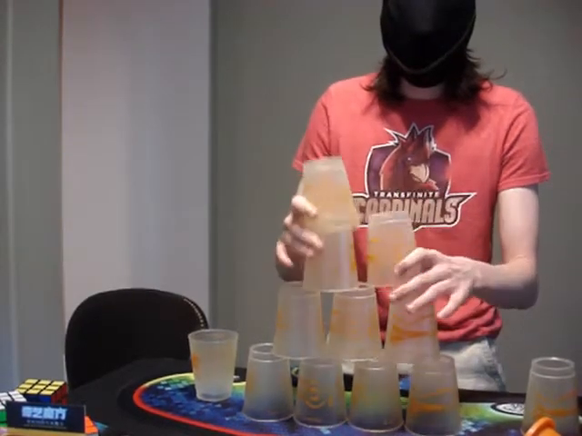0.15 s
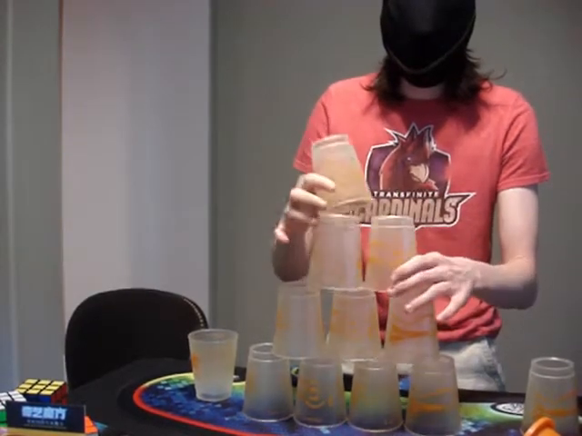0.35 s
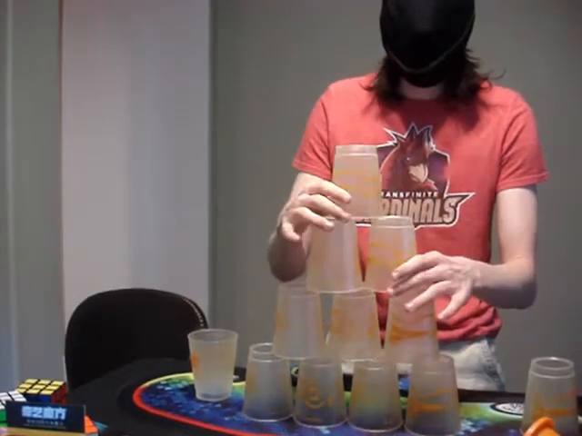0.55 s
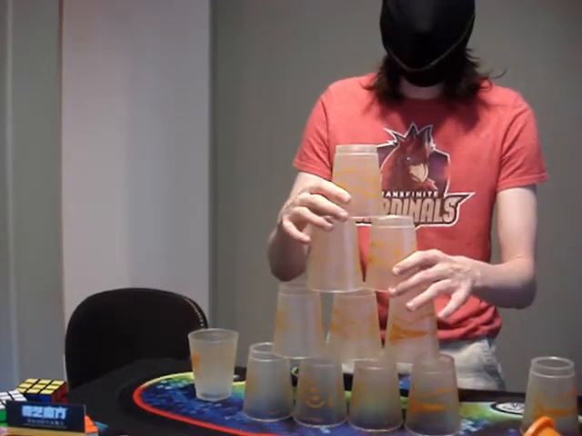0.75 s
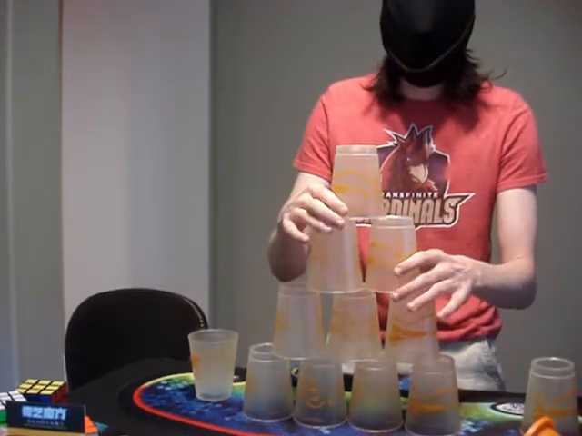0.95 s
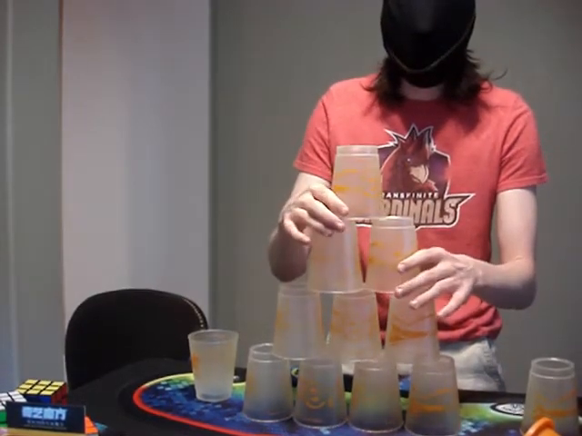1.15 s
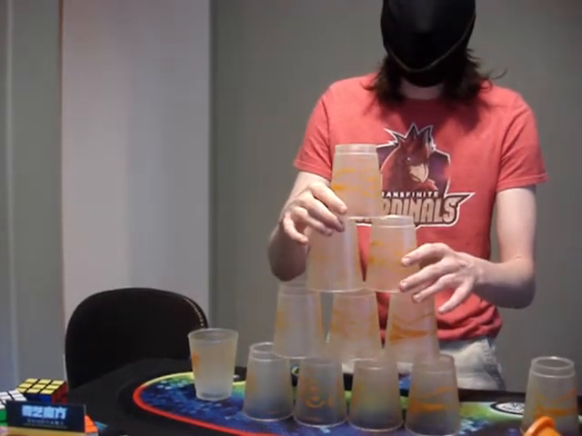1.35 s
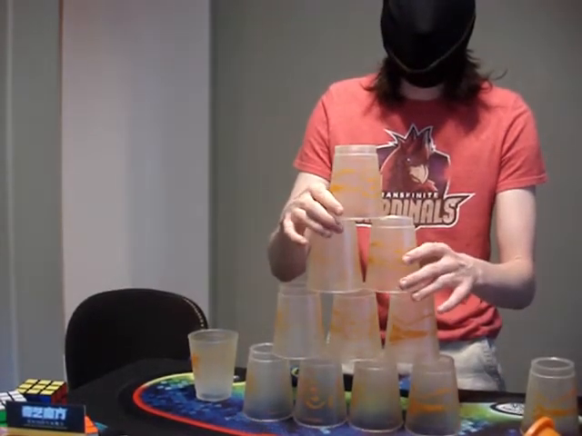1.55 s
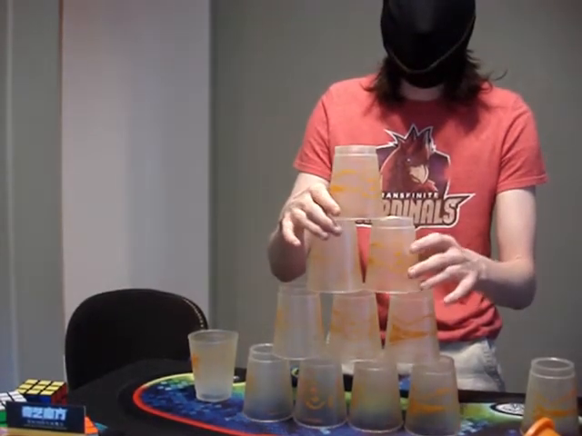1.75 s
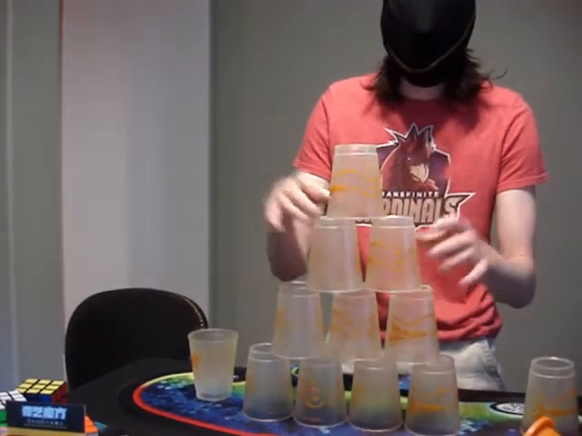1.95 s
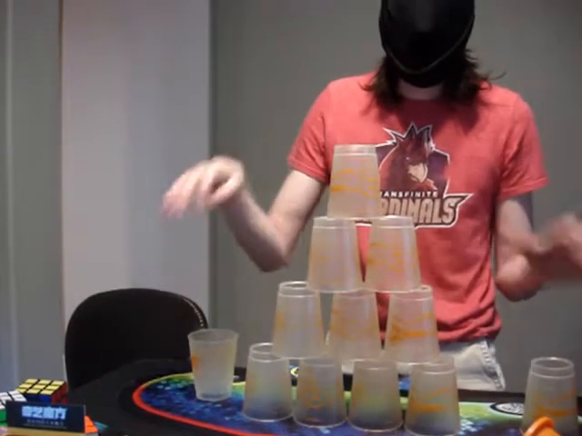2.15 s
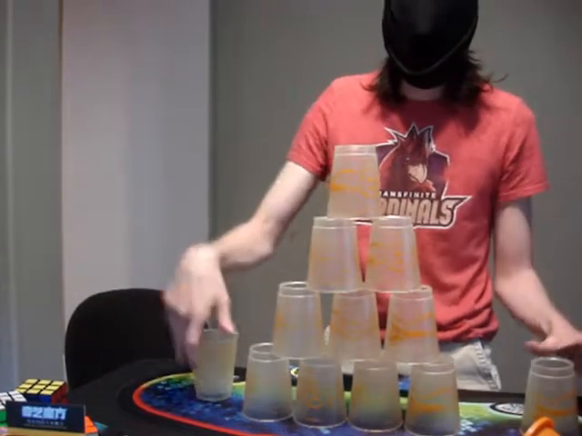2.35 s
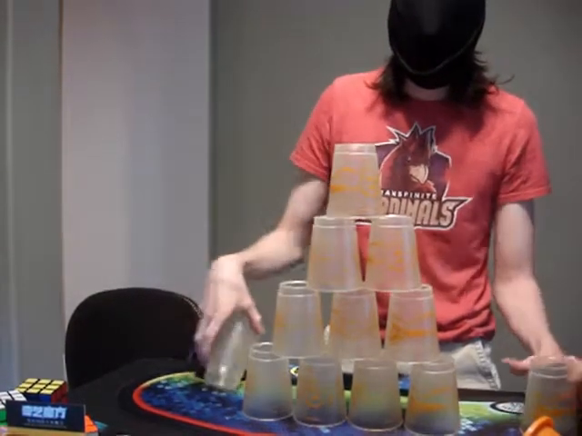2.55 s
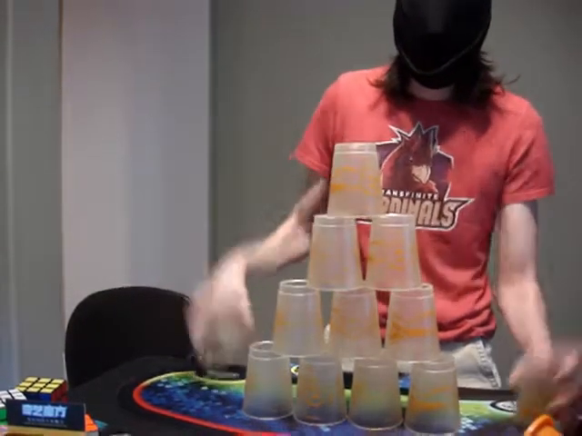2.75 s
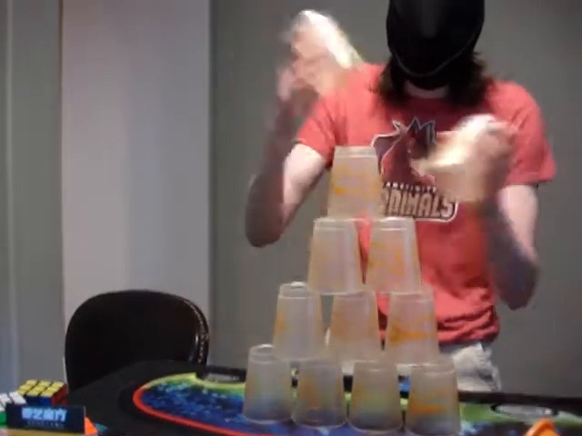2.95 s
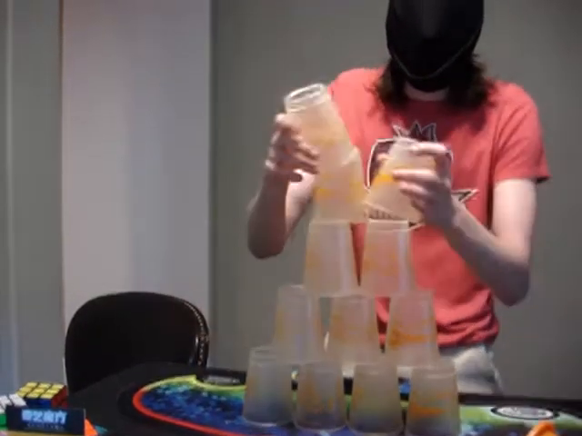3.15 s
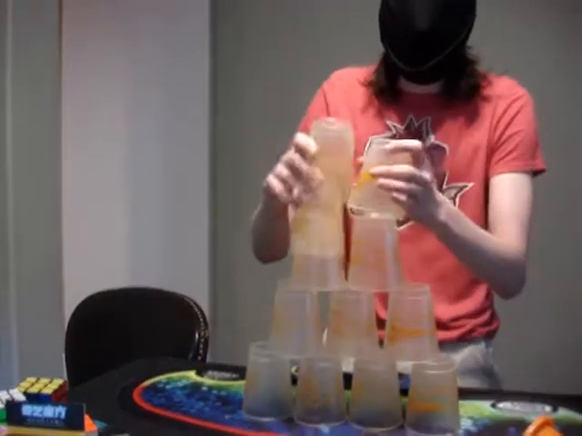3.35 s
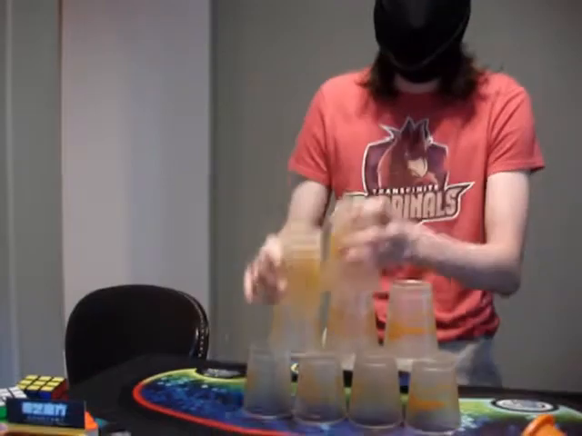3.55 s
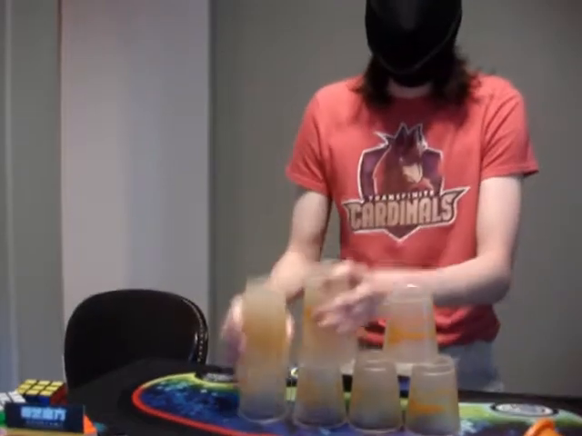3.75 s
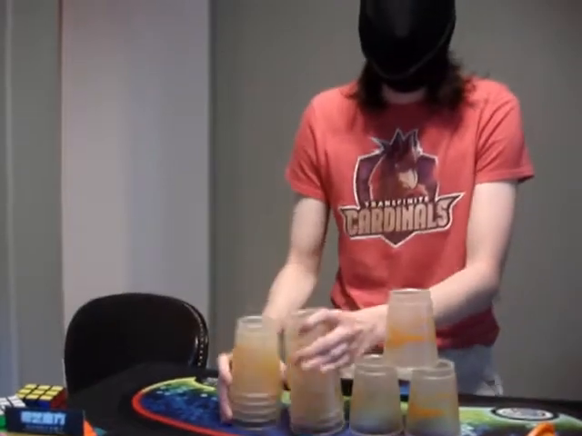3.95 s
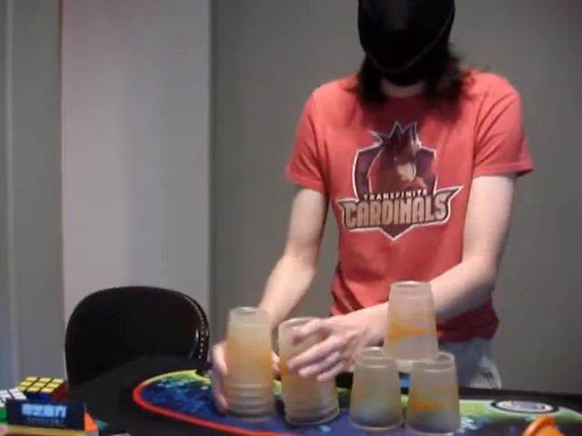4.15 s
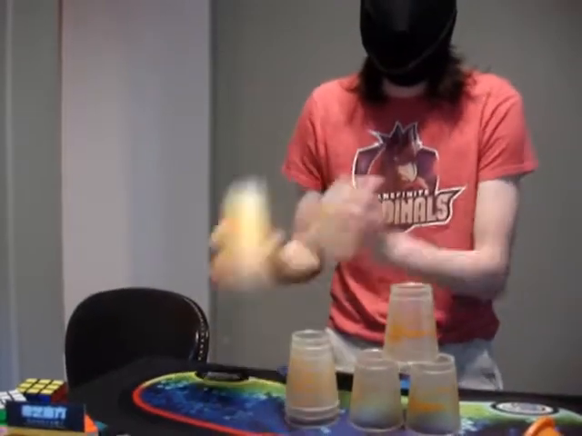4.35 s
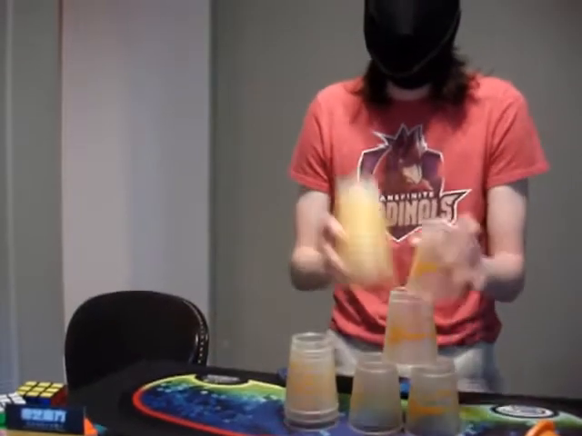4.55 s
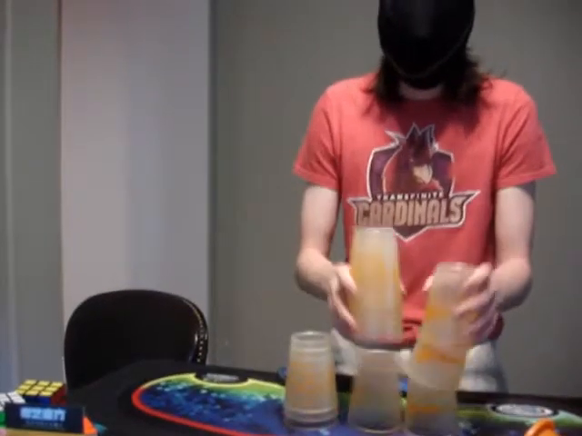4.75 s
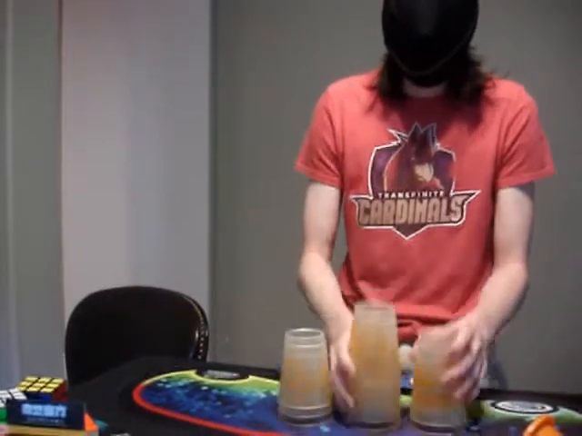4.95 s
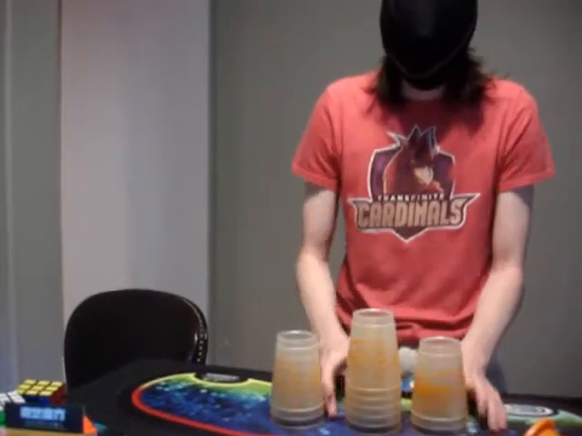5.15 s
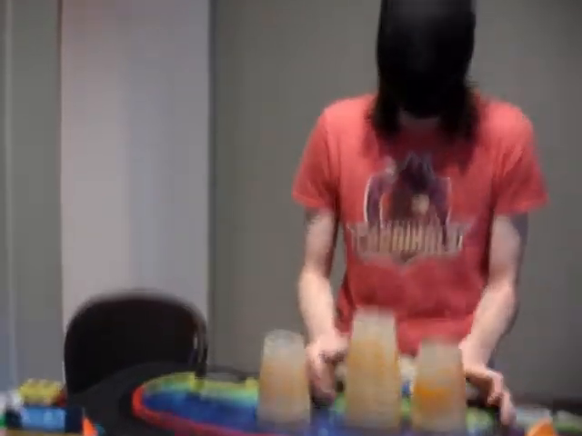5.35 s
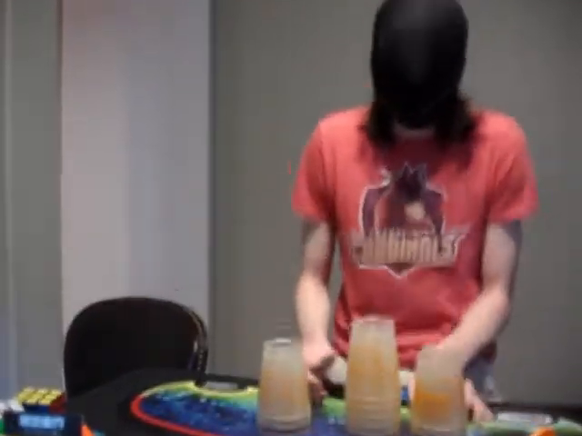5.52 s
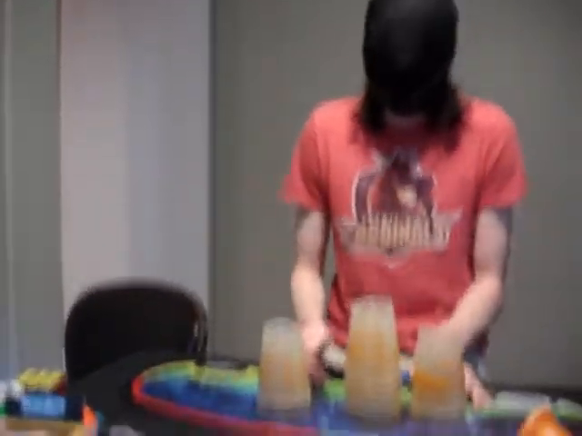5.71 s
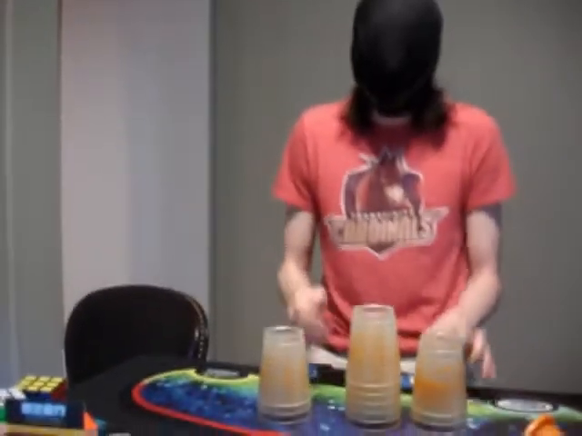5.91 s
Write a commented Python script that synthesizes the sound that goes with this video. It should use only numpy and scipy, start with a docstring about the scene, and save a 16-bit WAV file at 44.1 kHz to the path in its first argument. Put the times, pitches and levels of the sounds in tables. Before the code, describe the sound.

Thin plastic cups are set on a pyramid close to the microphone, making a quick cluster of hollow clicks, loudest between 0.2 and 0.6 seconds. A few faint ticks follow around 1 second, and at 1.2 seconds one sharp clack comes from farther across the room. A lull follows, with only faint steady ventilation, until soft table bumps and a finger tap at about 2.5 to 2.7 seconds. From 3.1 to 4.1 seconds the cups are swept into nested stacks in a rapid clatter of knocks, rattles and tiny scrapes, with dull thuds on the padded table. After a short gap, a second run lasts from 4.6 to 5 seconds. Muffled thuds and light taps follow, the firmest at 5.5 seconds, with a last tap near 5.8. The small bare room rings briefly after each knock.

```python
"""A small bare room, the microphone close to a padded table where thin plastic cups are being stacked.
Cups are set on a pyramid, then swept down into nested stacks. Each knock is a rim tick and a short
hollow ring; a nesting cup rattles and scrapes until it is seated, and the table thuds under its mat.
One sharp clack comes from farther off. The room rings after everything, over steady ventilation."""
import sys
import numpy as np
from scipy import signal
from scipy.io import wavfile
from scipy.ndimage import uniform_filter1d, minimum_filter1d

SR = 44100
rng = np.random.default_rng(int(sys.argv[2]) if len(sys.argv) > 2 else 0)


def master(y):
    """Save y as 16-bit WAV."""
    cut = np.clip(np.atleast_2d(y).T, -1, 1)
    pcm = np.round(cut * 32767)  # scale
    wavfile.write(sys.argv[1], SR, pcm.astype(np.int16))


N = 263702
AGE = np.arange(SR // 6) / SR  # seconds since a contact

# Cups set on the pyramid. Each row: start in seconds, ring level in dB, tick level in dB.
SET_DOWNS = [(0.002, -18, -35), (0.039, -14.5, -35), (0.206, 2.5, -14), (0.259, 1.5, -14), (0.284, -2, -14),
             (0.425, -7, -34), (0.442, 2.5, -7.5), (0.525, 3.5, -16), (0.537, -7.5, -12.5), (0.577, 8, -4),
             (0.589, -8.5, -8), (0.904, -22.5, -37), (0.923, -13.5, -30), (1.004, -15, -32.5),
             (1.155, -24.5, -32)]
# Cups dropping into one another. Each row: start in seconds, ring level in dB, ring centre in Hz,
# hollow air tone in dB against the ring, tick level in dB, time until seated in seconds.
NESTINGS = [(3.109, 9, 875, -13, 1.5, 0.016), (3.116, 1, 1433, 6, -17, .03),
            (3.145, 0.5, 960, -6.5, -7.5, .03), (3.166, -1.5, 1070, -4.5, -20, .03),
            (3.191, 4.5, 1460, -20, -9.5, .035), (3.315, -7, 933, -3, -12, .02),
            (3.328, 2, 1130, -13, -2.5, .02), (3.386, -5.5, 690, -21, -13.5, .04),
            (3.432, -6.5, 850, -23, -10.5, .035), (3.471, 2, 910, -2.5, -3.5, .06),
            (3.556, -6, 990, 0.5, -2.5, .05), (3.603, -1, 1500, 2, -2.5, 0.02),
            (3.653, -6.5, 1630, -7, -12, 0.011), (3.678, 0.5, 780, -5.5, -7, .05),
            (3.746, -6, 922, 7, -4, .075), (3.827, -5, 1120, -18, -6, 0.011),
            (3.88, -3, 1816, -0.5, -7, .07), (3.961, -16, 2010, -4, -16, .035),
            (4.012, -2.5, 1056, -10, -5.5, .03), (4.05, -19, 1110, -9, -20, .04),
            (4.121, -22.5, 1580, 4.5, -22.5, .02), (4.6002, 3, 680, -10, -4, .025),
            (4.61, -9, 1220, 9, -17, .07), (4.627, -1.5, 616, -1, -6.5, .03),
            (4.664, -4, 1230, 0.5, -10.5, .05), (4.8, -16, 850, -13, -12, .03),
            (4.82, -15, 676, 1.5, -10.5, .045), (4.866, -8.5, 640, -17, -9.5, .03),
            (4.919, -3, 1446, 1.5, -3.5, .065), (4.984, -13, 1370, -7, -33, .02),
            (5.015, -0.5, 1106, -26, -4, .025), (5.039, -11.5, 900, -26, -20, .03)]
# Table landings, fingertip taps and cups brushing past each other. Each row: start in seconds, level in dB.
THUDS = [(0.208, -19), (0.579, -18), (2.483, -26), (2.72, -16), (3.335, -23.5), (3.682, -18.5),
         (3.886, -5.5), (4.019, -29), (4.626, -6), (4.835, -13.5), (4.869, -14), (5.019, -14.5),
         (5.212, -17.5), (5.262, -14), (5.516, -6)]
TAPS = [(2.715, -22), (5.31, -22.5), (5.511, -27), (5.788, -26)]
BRUSHES = [(2.708, -44.5), (4.308, -47), (5.301, -57.5), (5.508, -52.5)]

# What rings when struck. Each row: frequency in Hz, relative level in dB, seconds to fall 60 dB.
CUP_MODES = [(454, -10.5, 0.049), (571, -3, 0.03), (649.5, -1, 0.029), (850, -2, 0.019), (908, 1.5, 0.013),
             (1097, -1.5, 0.026), (1232, 3, 0.017), (1464, -2, 0.035), (1526, -4.5, 0.013),
             (1860, -17.5, 0.03)]  # wall and hollow
RIM_MODES = [(2060, 4, 0.0068), (2590, -0.5, 0.0063), (3076, -4.5, 0.0046), (3254, -0.5, 0.012),
             (4250, -0.5, 0.019), (5276, 1, 0.022), (6260, -4, 0.017)]
TABLE_MODES = [(121.1, -14, 0.34), (179.3, 0, 0.07), (238, -1, 0.04), (283.3, -10.5, 0.088),
               (398, -10.5, 0.048), (473, 0.5, 0.028), (620, 5, 0.02)]
CLACK_MODES = [(594, -8, 0.17), (680, -20, 0.046), (1137, -9, 0.074), (1436, -3.5, 0.12),
               (2060, -5.5, 0.094), (2210, -1, 0.054)]

# Spectra of the noises. Each row: frequency in Hz, relative level in dB.
TICK_SPECTRUM = [(30, -24), (90, -23.5), (190, -10.5), (500, -0.5), (1500, 6), (2500, -0.5), (5000, -4),
                 (7000, -6), (10000, -15), (12000, -14), (16000, -16.5)]  # cup on cup
FINGER_SPECTRUM = [(60, -9), (300, 0.5), (1200, 7), (3000, 3.5), (6000, -14), (10000, -17.5), (16000, -26)]
SCUFF_SPECTRUM = [(100, -24), (1000, -7), (3000, -7), (6000, 4), (9000, -5.5), (16000, -24)]  # cup brushing cup
CLACK_SPECTRUM = [(80, -32), (200, -4), (450, -9), (700, 7), (1700, 2.5), (2100, 8.5), (2500, -2.5),
                  (3000, 1.5), (3850, 1.5), (4300, -9), (4900, -11), (5600, -15), (10000, -26),
                  (16000, -16)]
HUSH_SPECTRUM = [(15, -61.5), (25, -2), (92, -19), (120, -2.5), (229, -9.5), (249, -13.5), (363, -7),
                 (560, -8.5), (624, -5), (863, -9), (962, -7), (1130, -8.5), (1560, -11), (7710, -24),
                 (16000, -43)]

# Reflections off nearby surfaces. Each row: delay in seconds, gain as a factor.
ECHOES = [(.0029, 0.38), (.0085, 0.49), (0.0118, 0.24), (0.0135, 0.17), (.026, 0.11)]
# The room's decay. Each row: frequency in Hz, seconds to fall 60 dB.
ROOM_T60 = [(120, 0.33), (280, 0.45), (600, 0.56), (1100, 0.63), (2300, 0.69), (7000, 0.64), (14000, 0.54)]
# Colour of the cups' diffuse sound against the direct. Each row: frequency in Hz, gain in dB.
DIFFUSE_COLOUR = [(80, -0.5), (160, 7), (400, -1.5), (1200, -2), (3000, -3), (6000, -3.5), (9500, -8.5),
                  (12000, -0.5)]
# Overall tone: full middle, treble cut sharply above 10 kHz, faint fizz at the top.
# Each row: frequency in Hz, gain in dB.
OVERALL_COLOUR = [(30, -3.5), (300, 5), (1500, 2.5), (5000, 4), (9800, 0), (10400, -20), (12000, -28.5),
                  (15500, -14.5)]


def nesting_cups(slide_db=-24, rattle_db=-7, rattle_tick_db=-11, bump_db=-37):
    """Close up, a cup strikes the one below, then rattles and slides down until it is seated."""
    out = np.zeros(N)
    contact = dict(rim_db=-2.5, rim_hz=2730, soft_hz=10000, octaves=1.0, rise_s=0.0002)
    for s, ring_db, centre_hz, hollow_db, tick_db, seat_s in NESTINGS:
        add(out, s, cup_knock(ring_db, centre_hz, tick_db, hollow_db, **contact))
        add(out, s, amp(ring_db + bump_db) * low_bump())
        add(out, s, amp(tick_db + slide_db) * scrape(seat_s, wall_slip()))
        for delay, db in rebounds(seat_s):
            rattle = cup_knock(ring_db, centre_hz, tick_db + rattle_tick_db, hollow_db, **contact)
            add(out, s + delay, amp(rattle_db + db) * rattle)
    return out


def pyramid_cups(chatter_db=-19.5, chatter_s=0.018):
    """Close up, loose cups land rim first on the pyramid and chatter briefly."""
    out = np.zeros(N)
    for s, ring_db, tick_db in SET_DOWNS:
        knock = cup_knock(ring_db, centre_hz=753, tick_db=tick_db, hollow_db=-24,
                          rim_db=-8.5, rim_hz=4800, soft_hz=7000, octaves=1.8, rise_s=0.00098)
        add(out, s, knock)
        for delay, db in rebounds(chatter_s):
            add(out, s + delay, amp(chatter_db + db) * rng.choice([-1, 1]) * knock)
    return out


def cup_knock(ring_db, centre_hz, tick_db, hollow_db, rim_db, rim_hz, soft_hz, octaves, rise_s):
    """A stiff rim strikes, and the walls and the air between them ring."""
    tick = crack(TICK_SPECTRUM, decay_s=0.005)
    tick += amp(rim_db) * ring(RIM_MODES, 0.04, rim_hz, octaves=0.76)
    give = np.exp(-2 * np.pi * soft_hz / SR)  # a gentler contact lasts longer and dulls the tick
    tick = signal.lfilter([1 - give], [1, -give], tick)
    hollow = ring([(centre_hz, 0, .032)], spread=0.019)
    walls = ring(CUP_MODES, 0.018, centre_hz, octaves)
    body = (walls + amp(hollow_db) * hollow) * (1 - np.exp(-AGE / rise_s))
    return amp(ring_db) * body + amp(tick_db) * tick


def rebounds(length_s, count=4, step_db=-2.5):
    """A cup bounces at uneven intervals, ever more softly: pairs of delay in seconds and level in dB."""
    bounce = np.arange(count)
    delays = length_s * (bounce + rng.uniform(.5, 1.5, count)) / count
    return zip(delays, step_db * bounce)


def wall_slip():
    """Wall on wall: one slip sets the cup and its rim ringing."""
    tick = crack(TICK_SPECTRUM, decay_s=0.0018)
    rasp = ring(RIM_MODES, spread=0.067, centre_hz=2860, octaves=0.16)
    body = ring(CUP_MODES, spread=0.073, centre_hz=1300, octaves=0.5)
    return tick + amp(-2) * rasp + amp(-7) * body


def scrape(length_s, voice, slips_per_s=1600):
    """Dense tiny slips of uneven size, each sounding the same voice."""
    n = int(length_s * SR)
    sizes = rng.standard_normal(len(AGE))
    slipping = rng.random(len(AGE)) < slips_per_s / SR
    slips = (sizes * slipping)[:n] * signal.windows.tukey(n, .3)
    rub = signal.fftconvolve(slips, voice)
    return rub * np.sqrt(n) / (np.linalg.norm(rub) + 1e-9)


def low_bump(decay_s=0.0041):
    """A faint, brief bass bump under each nesting knock."""
    u = AGE / decay_s
    return u * (2 - u) * np.exp(-u)


def padded_table(settle_s=.028, settle_db=-3):
    """Stacks and hands land on one edge, then settle flat with a deeper bump; fingers tap the cups."""
    out = np.zeros(N)
    for s, db in THUDS:
        add(out, s, amp(db) * thud(centre_hz=223))
        add(out, s + settle_s, amp(db + settle_db) * thud(centre_hz=189))
    for s, db in TAPS:
        add(out, s, amp(db) * crack(FINGER_SPECTRUM, decay_s=0.0075))
    return out


def thud(centre_hz, sharp_share=0.17, sink_s=0.007):
    """The table top rings dully; the pitch starts high and sinks as the mat gives."""
    tone = ring(TABLE_MODES, 0.012, centre_hz, octaves=0.83) * (1 - np.exp(-AGE / 0.002))
    lead_s = sharp_share * sink_s * (1 - np.exp(-AGE / sink_s))
    return np.interp(AGE + lead_s, AGE, tone)


def cup_brushes():
    """Cups brushing past each other leave a short, thin scuff on the plastic."""
    out = np.zeros(N)
    for s, db in BRUSHES:
        add(out, s, amp(db) * scrape(length_s=.03, voice=impulse(SCUFF_SPECTRUM)))
    return out


def far_clack(start_s=1.217):
    """One hard clack across the room: a crack and a weaker ring."""
    out = np.zeros(N)
    clack = crack(CLACK_SPECTRUM, decay_s=0.004) + amp(-11.5) * ring(CLACK_MODES, spread=0.0017)
    add(out, start_s, amp(-11) * clack)
    return out


def ring(modes, spread, centre_hz=1000, octaves=np.inf):
    """Dying modes, detuned at random by spread; the place of the blow favours those near a centre."""
    hz, db, t60 = np.transpose(modes)[:, :, None]
    detune, scatter_db = rng.standard_normal((2, len(modes), 1))
    weight = amp(db + scatter_db) / (1 + (np.log2(hz / centre_hz) / octaves) ** 2)
    weight *= rng.choice([-1, 1], hz.shape) / np.linalg.norm(weight)
    decay = np.exp(-np.log(1000) * AGE / t60)
    tones = np.sin(2 * np.pi * hz * (1 + spread * detune) * AGE)
    return .5 * (weight * decay * tones).sum(0)


def crack(spectrum, decay_s):
    """A very short burst of contact noise: ragged in time, smooth in spectrum."""
    bins = np.fft.fft(rng.standard_normal(len(AGE)) * np.exp(-AGE / decay_s))
    whitened = np.fft.ifft(bins / minimum_phase(abs(bins))).real
    burst = colour(whitened, spectrum)
    return burst / np.linalg.norm(burst) * np.sqrt(2 * np.pi)


def echoes(x):
    """First reflections reach the microphone off the table and nearest walls."""
    out = np.zeros(N)
    for s, gain in ECHOES:
        add(out, s, gain * x)
    return out


def room(x, gap_s, rise_s, reflections_per_s=6000):
    """Diffuse tail: dense reflections that build up after a gap and die band by band."""
    t = np.arange(SR) / SR
    reflections = rng.choice([-1, 1], SR) * (rng.random(SR) < reflections_per_s / SR)
    hz, when, bands = signal.stft(reflections, SR, nperseg=256)
    decay = np.exp(-np.log(1000) * when / value_at(ROOM_T60, hz)[:, None])
    tail = signal.istft(bands * decay, SR, nperseg=256)[1][:SR]
    tail *= np.clip((t - gap_s) / rise_s, 0, 1)
    return signal.fftconvolve(x, tail / np.linalg.norm(tail))[:N]


def shifting_room(x, tails=6, turns_per_s=11):
    """The cups move about, so successive knocks meet different reflections: several tails take turns."""
    turn = np.arange(N) / SR * turns_per_s
    shares = np.array([np.maximum(np.cos(2 * np.pi * (turn - k / tails)) - .5, 0) for k in range(tails)])
    shares /= np.linalg.norm(shares, axis=0)
    return sum(room(x * share, gap_s=0.0054, rise_s=0.015) for share in shares)


def hush():
    """Steady ventilation and microphone hiss, far below the cups."""
    noise = colour(rng.standard_normal(N), HUSH_SPECTRUM)
    return amp(-49.5) * noise / noise.std()


def amp(db):
    """Decibels to gain."""
    return 10 ** (np.asarray(db) / 20)


def add(mix, s, sound):
    """Mixes a sound in at s seconds."""
    part = mix[max(round(s * SR), 0):][:len(sound)]
    part += sound[:len(part)]


def value_at(points, hz):
    """A table's value on a log-frequency axis."""
    point_hz, values = np.transpose(points)
    return np.interp(np.log(hz + 1), np.log(point_hz + 1), values)


def minimum_phase(gain):
    """The spectrum of the most compact click with these gains."""
    return np.exp(np.conj(signal.hilbert(np.log(gain + 1e-9))))


def impulse(spectrum, size=4096):
    """The click that has a given spectrum."""
    gain = amp(value_at(spectrum, abs(np.fft.fftfreq(size, 1 / SR))))
    return np.fft.ifft(minimum_phase(gain)).real[:size // 2]


def colour(x, spectrum):
    """Filters a sound by a spectrum."""
    return signal.fftconvolve(x, impulse(spectrum))[:len(x)]


def scene():
    """Cups and table near the microphone; the far clack arrives mostly as room sound."""
    cups = pyramid_cups() + nesting_cups() + cup_brushes()
    table, clack = padded_table(), far_clack()
    mix = cups + echoes(cups) + amp(-1.5) * colour(shifting_room(cups), DIFFUSE_COLOUR)
    mix += table + room(table, gap_s=0.0023, rise_s=0.0052)
    mix += clack + amp(5.5) * echoes(clack) + amp(15) * room(clack, gap_s=0.00085, rise_s=0.01)
    return (mix + hush())[None]


def record(dry, ceiling=.97, edge_hz=16200):
    """In mono: the overall tone, a fast limiter on the loudest knocks, and the band limit."""
    heard = colour(dry[0], OVERALL_COLOUR)
    overshoot = np.maximum(abs(heard) / ceiling, 1)
    held_gain = minimum_filter1d(1 / overshoot, size=49)
    gain = uniform_filter1d(uniform_filter1d(held_gain, size=25), size=25)
    lowpass = signal.firwin(511, edge_hz, window=("kaiser", 9), fs=SR)
    return signal.oaconvolve(heard * gain, lowpass, "same")[None]


dry = scene()
out = record(dry)
master(out)
```